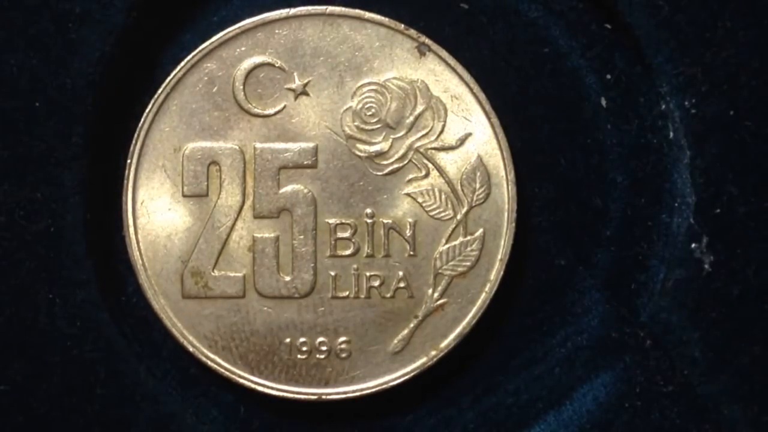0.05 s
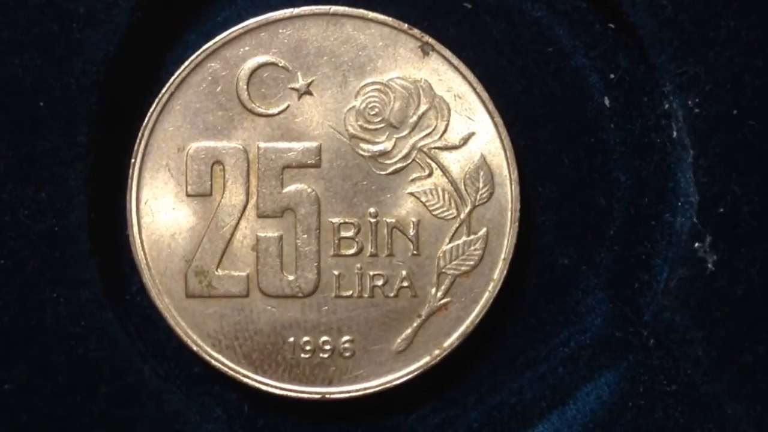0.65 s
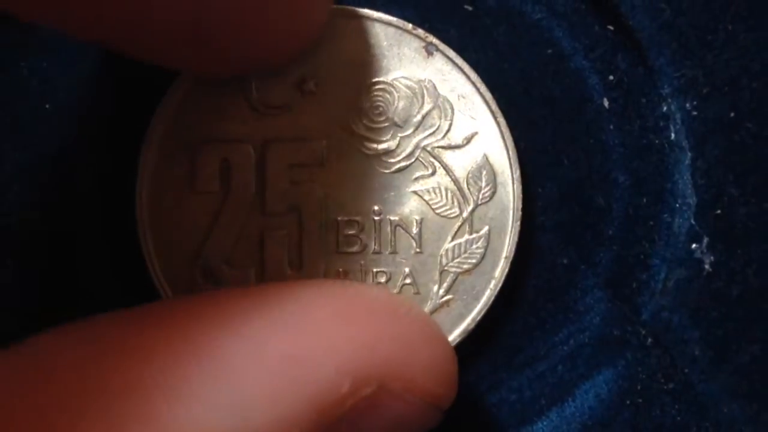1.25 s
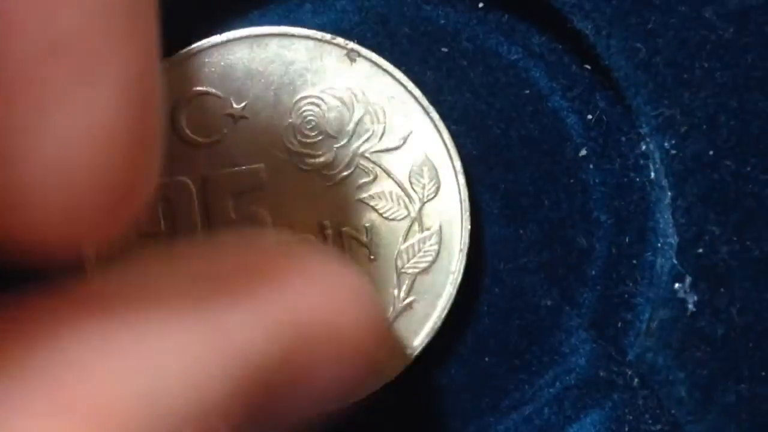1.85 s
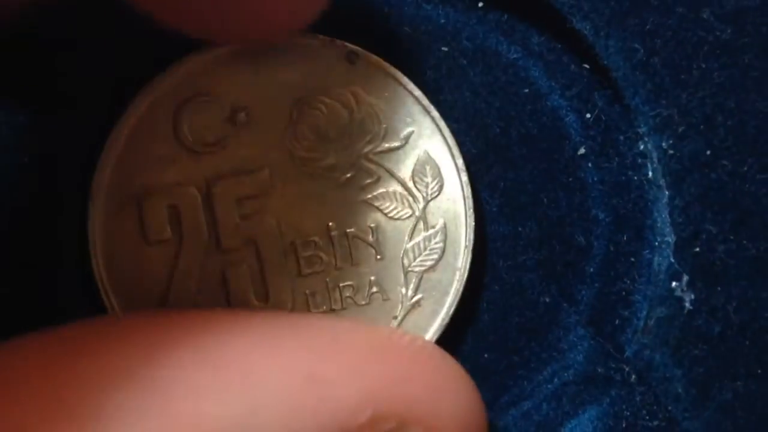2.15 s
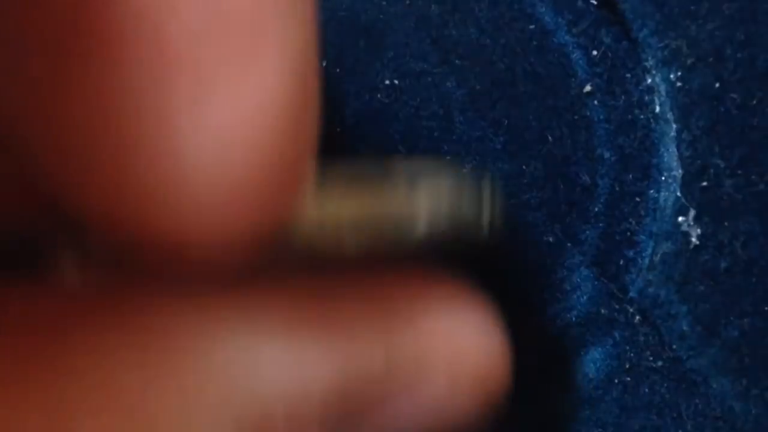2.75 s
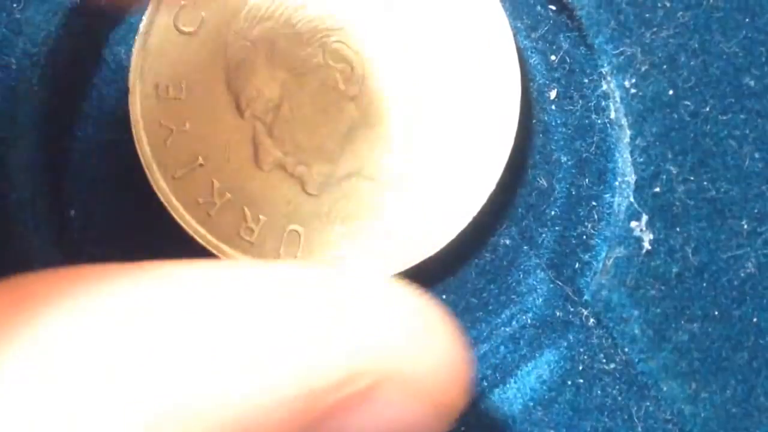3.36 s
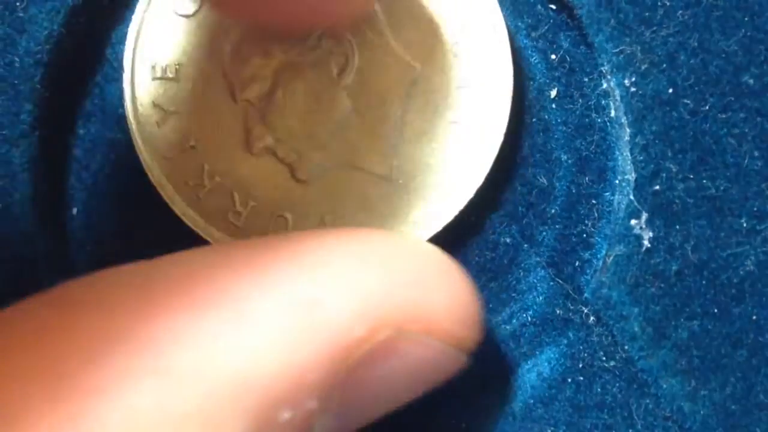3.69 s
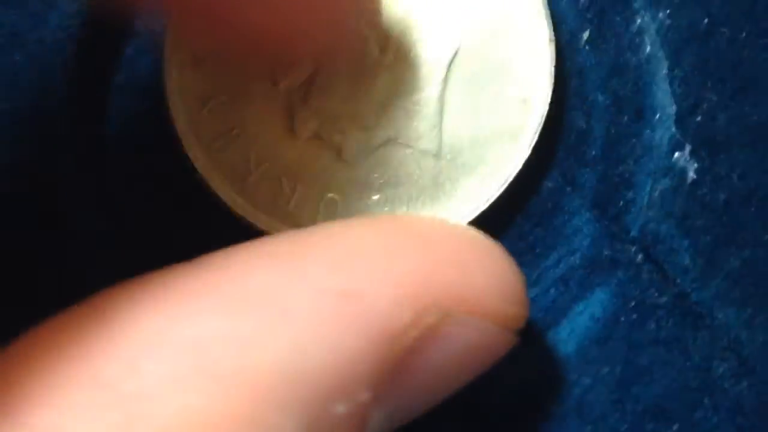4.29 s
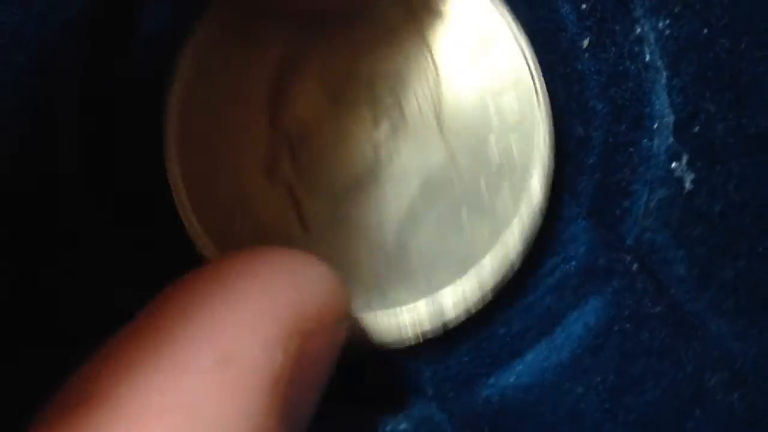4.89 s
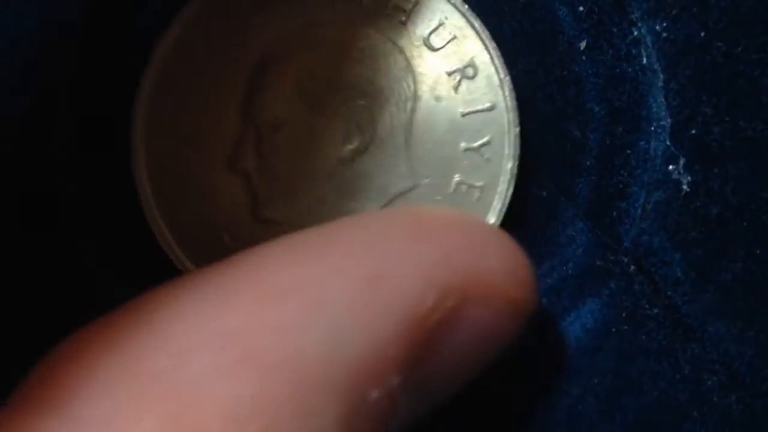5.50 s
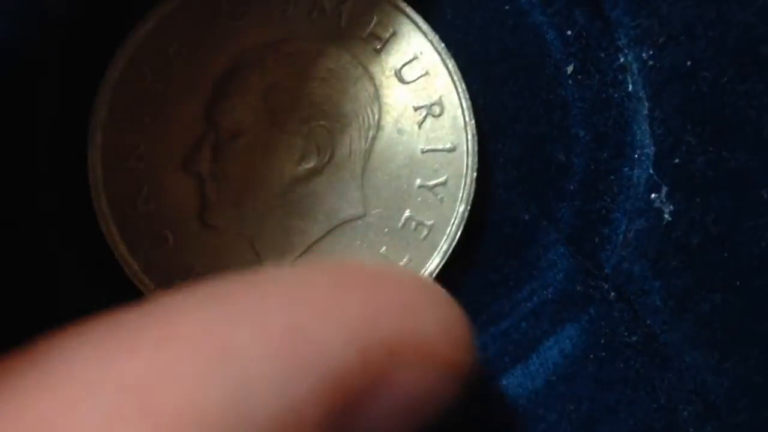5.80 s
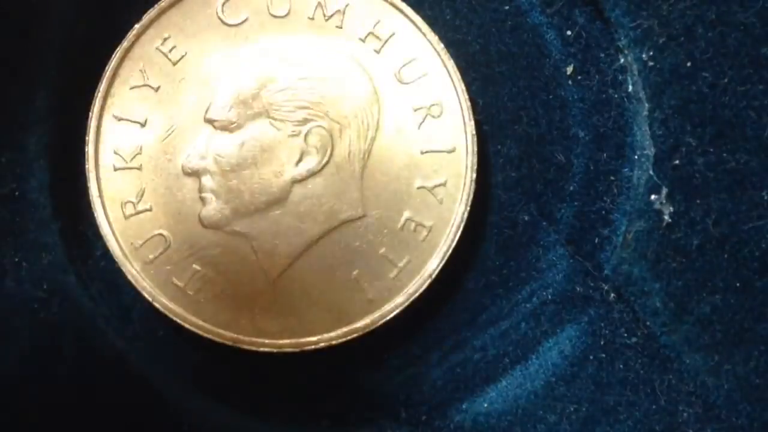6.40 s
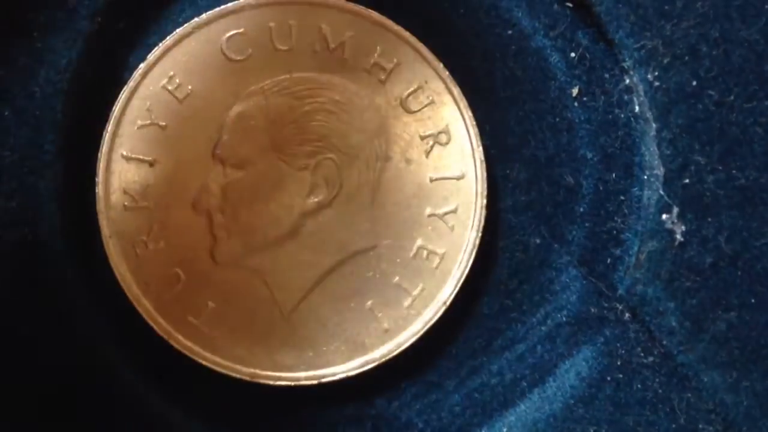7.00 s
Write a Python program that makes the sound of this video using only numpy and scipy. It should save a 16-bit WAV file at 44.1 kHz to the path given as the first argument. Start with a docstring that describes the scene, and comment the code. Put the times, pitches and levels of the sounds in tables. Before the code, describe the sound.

Fingers handle a metal coin on a hollow, velvet-lined tray, heard up close in a quiet room. A few faint taps lead into soft rubbing, then the coin falls with a sharp click. Short scrapes and small bumps follow, with a very brief high ring and a second sharp clack. The coin then slides and turns in uneven, gently rasping strokes that thin out near the end, over a faint low hum.

```python
"""A coin handled in a velvet-lined tray

Fingers slide and turn a metal coin, heard from close by. Stick-slip friction makes skin and pile hiss
and the rim rasp in short strokes. Taps, bumps and two drops excite the modes of the hollow tray.
Left free, the disc rings briefly at a very high pitch. A mains hum fills the quiet room."""
import sys
import numpy as np
from scipy import signal
from scipy.fft import rfft, irfft, next_fast_len
from scipy.io import wavfile
from scipy.ndimage import map_coordinates

SR = 44100
rng = np.random.default_rng(int(sys.argv[2]) if len(sys.argv) > 2 else 0)


def dump(signal):
    """Clip the signal to [-1, 1] and save it as 16-bit WAV at the path in sys.argv[1]."""
    limited = np.clip(np.atleast_2d(signal).T, -1, 1)
    pcm = np.round(limited * 32767).astype(np.int16)
    wavfile.write(sys.argv[1], SR, pcm)


N = 310797
TIME = np.arange(N) / SR

# Friction spectrum of skin and pile: (frequency [Hz], relative level [dB])
HISS_SPECTRUM = [(500, -26), (2000, -13.5), (3500, 1), (5200, 0.5), (7200, -3), (8800, -3.5), (10000, -3.5),
                 (13000, -5), (15200, -8.5)]
# Modes of the tray's cup, lowest first: (frequency [Hz], bandwidth [Hz], relative gain [dB])
CUP_MODES = [(1789, 63, 4.5), (2135, 39, -4), (2400, 80, -5.5), (3890, 110, -7), (4160, 87, -5),
             (4800, 68, -18), (6300, 100, -19)]
# The coin falls over, edge first, then flat: (time of flat landing [s], lead of edge [s], level [dB],
# edge pitch [Hz], flat pitch [Hz], relative thud [dB], relative snap [dB])
DROPS = [(1.7744, .0038, -11.5, 474, 1338, -8, -5), (3.2055, .0026, -10.5, 1724, 1367, -0.5, -1.5)]


def impacts():
    """Impulsive excitation: a damped knock, a snap of hard surfaces and a low thud into the padding."""
    thud_hz, thud_lead_s, clack_hz, clack_db = 148, 0.0015, 8120, -3.5
    knocks, snaps, thuds = np.zeros((3, N))
    t = np.arange(SR // 8) / SR
    for time, db, hz, t60, snap_db, thud_db in blows():
        add(knocks, time, amp(db) * damped_sine(t, hz, t60))
        push = 2.3 * fade(t, t60=0.0051)
        grit = 0.82 * fade(t, t60=0.0033) * rng.standard_normal(len(t))
        low_hz = min(990 + hz / 2, 2200)  # light, high contacts have no body
        add(snaps, time, amp(db + snap_db) * band(push + grit, low_hz, 8400))
        add(thuds, time - thud_lead_s, -amp(db + thud_db) * damped_sine(t, thud_hz, t60=0.022))
    for time, _, db, *_, snap_db in DROPS:  # a flat landing adds a bright clack
        add(snaps, time, amp(db + snap_db + clack_db) * damped_sine(t, clack_hz, t60=0.0019))
    return tray(band(knocks, 300, 8200) + snaps, ring_db=-4) + band(thuds, 100, 900)


def blows():
    """Contact hardness sets timbre: a harder tap is higher, with more snap and less thud."""
    # Rim and nails tap the tray: (time [s], level [dB], pitch [Hz])
    taps = [(.3548, -33, 5600), (0.8026, -39.5, 1260), (1.1272, -31, 3530), (1.1306, -33, 1150),
            (1.166, -41.5, 3980), (1.3728, -30, 2800), (1.3945, -32.5, 2570), (1.417, -28, 2830),
            (1.7762, -12.5, 2660), (1.7795, -21, 970), (1.792, -20, 1910), (2.167, -32, 1490),
            (2.398, -39.5, 6170), (3.029, -26, 2060), (3.4622, -38, 1310), (3.473, -32.5, 2530),
            (3.5906, -27.5, 1480), (4.2173, -31, 760), (4.2216, -30.5, 1260), (4.2256, -27, 704),
            (4.238, -36.5, 750), (4.573, -39, 9100), (4.707, -34.5, 1480), (6.6899, -50, 3610)]
    # Soft to hard taps: (pitch [Hz], relative snap [dB], relative thud [dB])
    hardness = [(604, -30, -10), (1200, -18, -20), (2500, -4.5, -36), (6000, -5, -37)]
    # A fingertip bumps the tray, which booms until the hand damps it: (time [s], level [dB], t60 [s])
    bumps = [(.3886, -43, 0.0058), (.619, -54.5, 0.033), (0.8026, -41, 0.026), (2.311, -41.5, 0.026),
             (2.95, -36, 0.041), (3.009, -33, 0.0036), (6.585, -49, 0.0078)]
    decay_cycles, boom_hz, edge_db = 7.6, 517, -6
    pitches, snaps_db, thuds_db = np.transpose(hardness)
    events = []  # (time [s], level [dB], pitch [Hz], t60 [s], relative snap [dB], relative thud [dB])
    for time, db, hz in taps:
        snap_db = np.interp(np.log(hz), np.log(pitches), snaps_db)
        thud_db = np.interp(np.log(hz), np.log(pitches), thuds_db)
        events.append((time, db, hz, decay_cycles / hz, snap_db, thud_db))
    events += [(time, db, boom_hz, t60, -29, 0.5) for time, db, t60 in bumps]
    for time, lead, db, edge_hz, flat_hz, thud_db, snap_db in DROPS:
        events.append((time - lead, db + edge_db, edge_hz, 0.008, -11, thud_db - edge_db))
        events.append((time, db, flat_hz, 0.0037, snap_db, -24))
    return events


def rim_scrapes():
    """Friction drives resonance: the rim rasps, and each tilt retunes the air pocket under the coin."""
    pocket_q, pocket_db, detuning_db_per_octave = 1.8, -2, 31
    rasp_power, cup_power, hiss_power, pocket = np.zeros((4, N))
    friction = tray(slips(rate=3000, scatter_db=3), ring_db=-15)
    for start, peak, end, ease, db, pocket_hz, hiss_db in drags():
        span = slice(int(start * SR), int(end * SR))
        ramp = np.interp(TIME[span], [start, peak, end], [0, 1, 0])
        force = amp(db) * np.sin(np.pi / 2 * ramp) ** ease
        rasp_power[span] += force ** 2
        hiss_power[span] += (force * amp(hiss_db)) ** 2
        # The cup sings when the pocket is tuned near its lowest mode.
        octaves_off = abs(np.log2(pocket_hz / CUP_MODES[0][0]))
        cup_power[span] += (force * amp(-detuning_db_per_octave * octaves_off)) ** 2
        drive = band(friction[span], pocket_hz / 1.46, pocket_hz * 1.65)
        tone = signal.lfilter(*signal.iirpeak(pocket_hz, pocket_q, fs=SR), drive)
        pocket[span] += amp(pocket_db) * force * unit(tone)
    # Spectrum of the dragging rim: (frequency [Hz], relative level [dB])
    rasp_spectrum = [(300, -37), (900, -3.5), (1400, -3), (1900, -1), (2600, -0.5), (3200, -9),
                     (4000, -9.5), (5000, -22.5), (7500, -24), (15000, -49)]
    catching = amp(1.4 * wobble(140))  # the rim catches and lets go
    cup = amp(-5.5) * unit(resonate(slips(rate=2800, scatter_db=5), CUP_MODES))
    rasp = amp(-3.5) * coloured(tray(slips(rate=3000, scatter_db=3.5), ring_db=-11.5), rasp_spectrum)
    hiss = amp(2.5) * coloured(tray(slips(rate=11000, scatter_db=4.5), ring_db=-1), HISS_SPECTRUM)
    scraping = np.sqrt(rasp_power) * rasp + np.sqrt(cup_power) * cup + np.sqrt(hiss_power) * hiss
    return catching * (scraping + pocket)


def drags():
    """Driven and free sliding: a pushed rim swells and fades; a skid starts at once and slows to rest."""
    # Fingers push the rim: (peak time [s], length [s], level [dB], pocket [Hz], relative hiss [dB])
    strokes = [(.683, .012, -63, 2170, -6), (.712, 0.023, -61.5, 1200, -13),
               (1.255, .035, -61.5, 2100, -10), (1.395, 0.11, -60, 2180, -3),
               (1.695, 0.12, -49, 1530, -12.5), (1.86, .075, -40.5, 1557, -14),
               (1.985, 0.079, -53.5, 1760, -10.5), (2.168, 0.011, -47, 1550, -2.5),
               (2.235, 0.163, -54.5, 1520, -2), (2.319, 0.038, -38, 1110, -8.5),
               (2.385, 0.093, -54.5, 980, -11), (2.66, 0.17, -55.5, 1300, -6),
               (2.727, 0.049, -44, 1220, -13), (2.758, .072, -46, 1720, -11), (3.03, 0.016, -47, 2110, -16),
               (3.17, .022, -54.5, 1710, -16), (3.322, 0.052, -55.5, 1750, -13),
               (3.728, 0.0725, -55.5, 1980, -1), (4.088, .045, -61, 2000, -1.5),
               (4.195, 0.068, -55, 1430, -4), (4.325, 0.034, -54, 1680, -6.5),
               (4.362, 0.09, -43, 1430, -12), (4.501, 0.021, -53, 1460, -15), (4.82, 0.141, -43, 1100, -14),
               (4.886, 0.0514, -47, 1050, -4.5), (4.97, 0.156, -53.5, 1200, -2.5),
               (5.033, 0.1, -50, 1260, -2.5), (5.173, 0.14, -60, 1500, -5.5),
               (5.345, 0.081, -63.5, 1450, -5.5), (5.49, .14, -49, 1130, -6.5),
               (5.683, 0.057, -47.5, 1210, -30), (5.71, .16, -52.5, 1410, -8.5),
               (5.857, 0.11, -59, 1407, -15), (6.765, 0.06, -51.5, 1497, -18.5),
               (6.8, 0.082, -55.5, 1400, -13), (6.86, .105, -51, 1410, -14)]
    # The coin slips free: (start [s], length [s], level [dB], pocket [Hz], relative hiss [dB])
    skids = [(1.082, 0.086, -57.5, 2250, -9), (1.77, .075, -45, 1400, -3.5),
             (2.948, 0.12, -39, 1765, -20.5), (3.079, 0.17, -59, 2000, -6.5),
             (3.206, 0.14, -48, 1740, -14.5)]
    rise_share, stroke_ease, skid_rise_s, skid_ease = 0.51, 1.46, 0.0043, 3
    # As the coin lands, the rim chatters for one very short stroke.
    chatters = [(time, 0.01, db - 16.5, hz, -12.5) for time, _, db, _, hz, *_ in DROPS]
    for peak, length, *sound in strokes + chatters:
        yield peak - rise_share * length, peak, peak + (1 - rise_share) * length, stroke_ease, *sound
    for start, length, *sound in skids:
        yield start, start + skid_rise_s, start + length, skid_ease, *sound


def coin_ring():
    """Free vibration: the disc's two lowest modes waver as it turns, damped by skin and velvet."""
    # The coin is left free: (time [s], level [dB], t60 [s], relative level of twin mode [dB])
    rings = [(2.952, -47.5, .17, -33), (3.025, -73, .14, 14), (3.09, -68.5, 0.26, -16),
             (3.16, -66, .25, -17.5), (3.205, -54.5, 0.098, -8)]
    mode_hz, twin_hz = 13345, 12890
    out, t = np.zeros(N), np.arange(SR // 3) / SR
    for time, db, t60, twin_db in rings:
        modes = damped_sine(t, mode_hz, t60) + amp(twin_db) * damped_sine(t, twin_hz, t60)
        attack = 1 - fade(t, t60=0.02)
        add(out, time, amp(db) * attack * modes)
    return out * amp(2.5 * wobble(70))


def velvet_glide():
    """Superposition: countless fibres brush skin and metal, merging into a hiss over the tray's murmur."""
    # The coin glides on the pile: (start [s], end [s], level [dB])
    glides = [(1.12, 1.354, -70), (1.382, 1.673, -64.5), (1.626, 2.312, -64.5), (2.283, 2.8, -70),
              (3.066, 3.352, -61.5), (3.41, 3.486, -60.5), (3.51, 4.25, -67.5), (4.236, 4.575, -72),
              (4.507, 5.107, -61.5), (5.098, 5.482, -76), (5.42, 5.975, -66.5), (5.991, 6.42, -76)]
    # Spectrum of the rubbed tray: (frequency [Hz], relative level [dB])
    murmur_spectrum = [(200, -16), (500, -12.5), (800, -6), (1200, 2.5), (1900, 0), (2600, -4.5),
                       (3200, -9), (4100, -11.5), (6000, -24.5), (15000, -29.5)]
    # Narrow bands that colour the hiss: (frequency [Hz], bandwidth [Hz], relative gain [dB])
    sheen_bands = [(3960, 160, -2), (6450, 110, -1.5), (9900, 330, -4)]
    attack_s, release_s = 0.096, 0.095
    speed = sum(amp(db) * np.clip(np.minimum((TIME - start) / attack_s, (end - TIME) / release_s), 0, 1)
                for start, end, db in glides)
    hiss = coloured(tray(slips(rate=13000, scatter_db=6), ring_db=-6.5), HISS_SPECTRUM)
    murmur = amp(1.5) * coloured(tray(slips(rate=4200, scatter_db=4), ring_db=-11), murmur_spectrum)
    caught_fibres = tray(slips(rate=110, scatter_db=5.5), ring_db=-3)
    grit = amp(-9) * unit(band(caught_fibres, 1200, 12000))
    cup = amp(-8.5) * unit(resonate(slips(rate=3400, scatter_db=4), CUP_MODES))
    sheen = amp(-9) * unit(resonate(slips(rate=12000, scatter_db=4.5), sheen_bands))
    pressure = amp(1.8 * wobble(45))
    return speed * pressure * (hiss + sheen + murmur + grit + cup)


def skin_squeaks():
    """Frictional chatter: dry skin vibrates briefly on the metal in a narrow, high band."""
    # Fingertip squeaks: (peak time [s], half-width [s], pitch [Hz], level [dB])
    squeaks = [(0.405, 0.011, 5230, -59.5), (1.832, 0.013, 6500, -57.5), (2.759, 0.019, 3900, -48),
               (4.831, 0.056, 4800, -53), (4.885, 0.0081, 10950, -51.5), (5.008, 0.055, 9970, -63),
               (5.499, 0.052, 10000, -59.5), (6.501, 0.0028, 4490, -63)]
    out, t = np.zeros(N), np.arange(-SR // 8, SR // 8) / SR
    for time, half_width, hz, db in squeaks:
        chatter = unit(band(rng.standard_normal(len(t)), hz / 1.15, hz * 1.15))
        add(out, time + t[0], amp(db) * np.exp(-(t / half_width) ** 2) * chatter)
    return out


def tray(x, ring_db):
    """Forced vibration: the hollow tray adds its ringing to the direct sound."""
    # Modes of the tray: (frequency [Hz], bandwidth [Hz], relative gain [dB])
    tray_modes = [(527, 26, 3), (1100, 36, -11), (1560, 60, -2.5), (1756, 11, -2.5), (1987, 78, -4.5),
                  (2320, 60, -8), (2390, 100, -1), (2810, 80, -5), (3813, 127, -2.5), (4120, 240, -9),
                  (5054, 48, -8), (5700, 120, -14), (6220, 80, -7), (8120, 180, -8), (9550, 150, -8.5),
                  (11630, 300, -1.5)]
    return x + amp(ring_db) * resonate(x, tray_modes)


def room(x, near_db, far_db):
    """Diffuse reflection: a faint wall tail and a soft, close wash, drawn afresh every eighth second."""
    t = np.arange(SR // 3) / SR
    far = band(rng.standard_normal(len(t)), 200, 5000) * fade(t, t60=0.21) * (t > 0.006)
    out = x + amp(far_db) * signal.fftconvolve(x, far / np.linalg.norm(far))[:N]
    t, step = t[:SR // 16], SR // 8
    for start in range(0, N, step):
        near = band(rng.standard_normal(len(t)), 430, 5400) * fade(t, t60=0.023) * (t > 0.001)
        scattered = signal.fftconvolve(x[start:start + step], near / np.linalg.norm(near))
        add(out, start / SR, amp(near_db) * scattered)
    return out


def background():
    """Line spectrum over broadband noise: mains hum and rumble, which sag once, and a faint hiss."""
    # Tones of the electrical hum: (frequency [Hz], relative level [dB])
    hum_tones = [(91.5, -78.5), (119.4, -61.5), (236.9, -73.5), (263.5, -74), (441, -87.5), (470, -81.5),
                 (517, -86)]
    # Hiss of the room: (frequency [Hz], relative level [dB])
    room_spectrum = [(500, -6), (620, -9.5), (900, -8), (1400, -16), (2200, -16), (3500, -18.5),
                     (6000, -23), (10000, -27), (15200, -26.5)]
    # Low rumble: (frequency [Hz], relative level [dB])
    rumble_spectrum = [(25, -20), (60, -5), (95, 2.5), (150, -4.5), (220, -5), (300, -5.5), (400, -10),
                       (520, -10.5), (700, -32)]
    sag_time, sag_half_width_s, sag_db = 0.97, 0.067, -4
    sag = amp(sag_db * np.exp(-((TIME - sag_time) / sag_half_width_s) ** 2))
    hum = np.zeros(N)
    for hz, db in hum_tones:
        rms = amp(db + 0.25 * wobble(4.2))
        phase_drift = 0.15 * wobble(2)
        hum += rms * np.sqrt(2) * np.sin(2 * np.pi * hz * TIME + phase_drift)
    hiss = filtered(coloured(rng.standard_normal(N), room_spectrum), lambda hz: hz > 600)
    rumble = amp(-67.5) * coloured(rng.standard_normal(N), rumble_spectrum)
    return amp(-1.17) * sag * (hum + rumble) + amp(-75) * unit(hiss)


def slips(rate, scatter_db):
    """Stick-slip as a Poisson process: tiny releases of uneven size, on average rate a second."""
    happens = rng.random(N) < rate / SR
    return happens * np.sign(rng.standard_normal(N)) * amp(scatter_db * rng.standard_normal(N))


def resonate(x, modes):
    """Modal superposition: x excites damped modes, the wider ones dying sooner."""
    t = np.arange(SR // 10) / SR
    ring = np.zeros(len(t))
    for hz, width, db in modes:
        envelope = amp(db) * 2 * np.pi * width / SR * np.exp(-np.pi * width * t)
        ring += envelope * np.cos(2 * np.pi * hz * t)
    return signal.oaconvolve(x, ring)[:N]


def damped_sine(t, hz, t60):
    """Free vibration of a single mode."""
    return fade(t, t60) * np.sin(2 * np.pi * hz * t)


def fade(t, t60):
    """Exponential decay, 60 dB in t60 seconds."""
    return np.exp(-np.log(1000) * t / max(t60, 1e-4))


def wobble(rate):
    """Smooth random modulation, rate knots a second."""
    at = np.arange(0, N / SR * rate + 1, 1 / 8)
    knots = rng.standard_normal(int(at[-1]) + 4)
    return np.interp(TIME * rate, at, map_coordinates(knots, [at]))


def filtered(x, response):
    """Linear filtering: the spectrum of x times a frequency response."""
    size = next_fast_len(N + SR // 2)
    return irfft(rfft(x, size) * response(np.fft.rfftfreq(size, 1 / SR)), size)[:N]


def coloured(x, spectrum):
    """Spectral shaping by (frequency [Hz], level [dB]) points, scaled to rms 1."""
    points_hz, db = np.transpose(spectrum)
    return unit(filtered(x, lambda hz: amp(np.interp(np.log(hz + 1), np.log(points_hz), db))))


def band(x, low_hz, high_hz):
    """A gentle causal band-pass."""
    edges = [low_hz, min(high_hz, SR / 2 - 100)]
    return signal.sosfilt(signal.butter(2, edges, 'band', fs=SR, output='sos'), x)


def amp(db):
    """Decibels to amplitude ratio."""
    return 10 ** (np.asarray(db) / 20)


def unit(x):
    """Normalisation to rms 1."""
    return x / np.sqrt(np.mean(x ** 2) + 1e-20)


def add(track, time, sound):
    """Superpose a sound on the track at a time in seconds."""
    part = track[max(round(time * SR), 0):][:len(sound)]
    part += sound[:len(part)]


def scene():
    """Superposition of the handling, its reflections and the background, in one channel."""
    handling = velvet_glide() + rim_scrapes() + impacts() + skin_squeaks() + coin_ring()
    return (room(handling, near_db=-13.5, far_db=-29) + background())[None]


def record(dry):
    """Band limiting: an ideal low-pass removes the highest treble."""
    cutoff_hz = 15400
    return np.array([filtered(x, lambda hz: hz < cutoff_hz) for x in dry])


dry = scene()
out = record(dry)
dump(out)
```